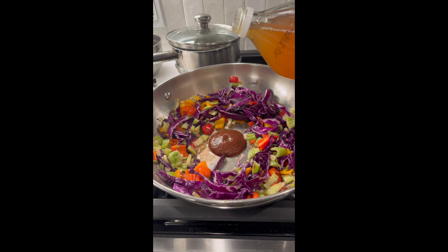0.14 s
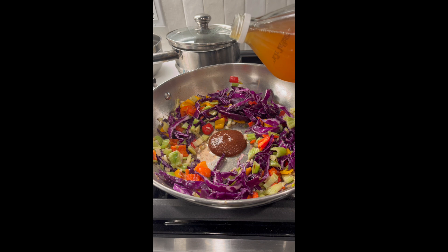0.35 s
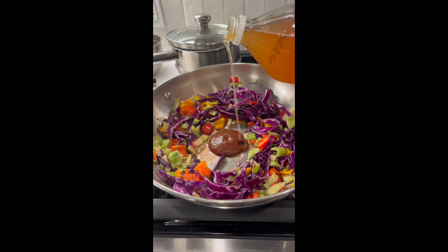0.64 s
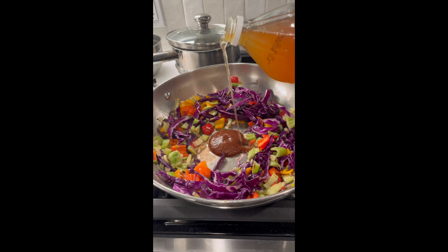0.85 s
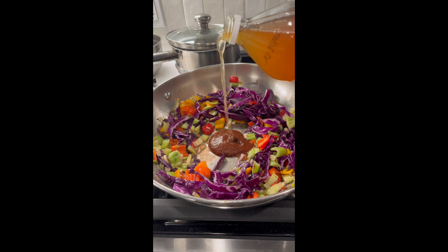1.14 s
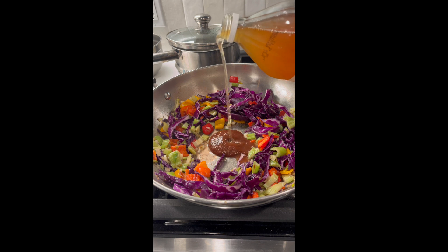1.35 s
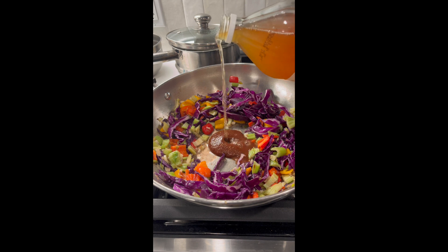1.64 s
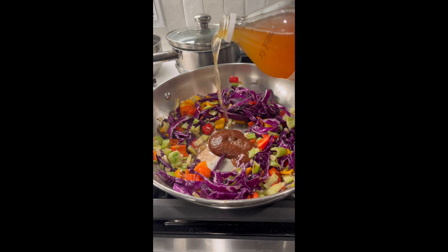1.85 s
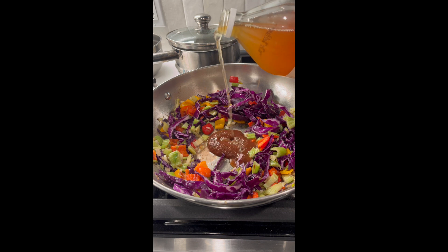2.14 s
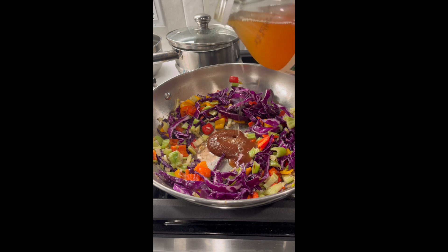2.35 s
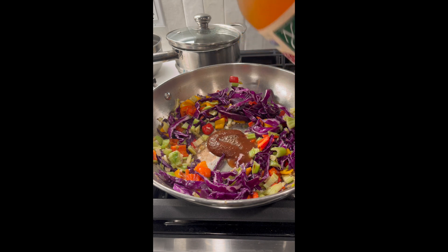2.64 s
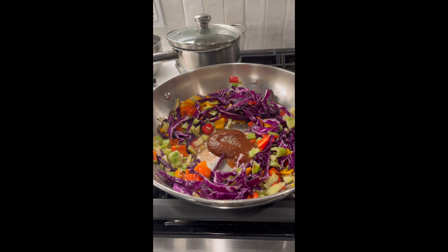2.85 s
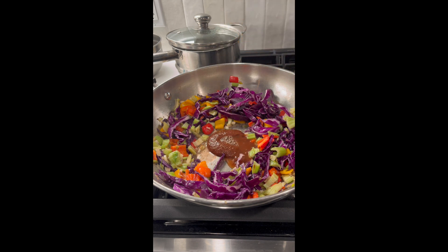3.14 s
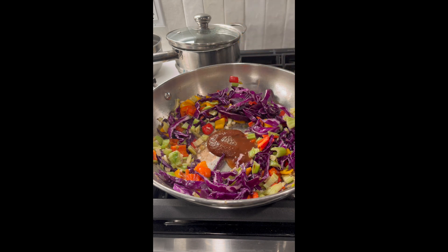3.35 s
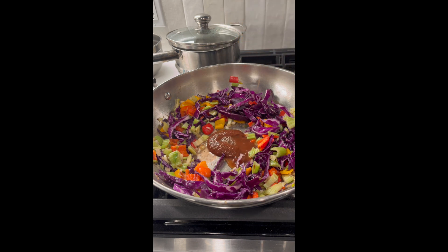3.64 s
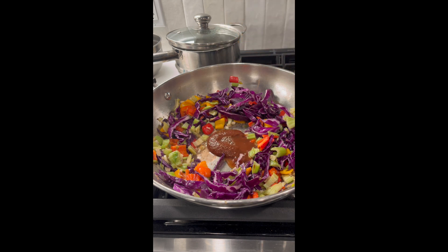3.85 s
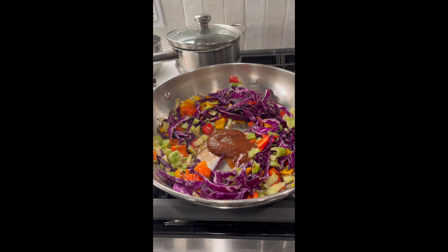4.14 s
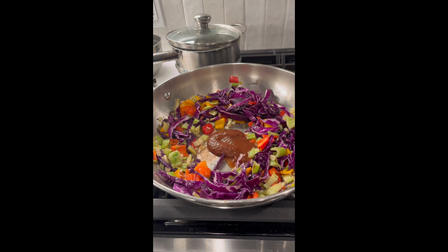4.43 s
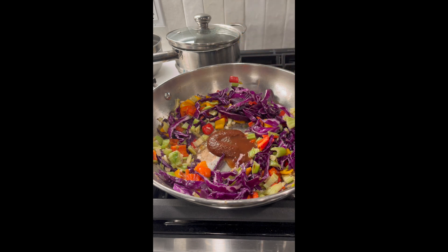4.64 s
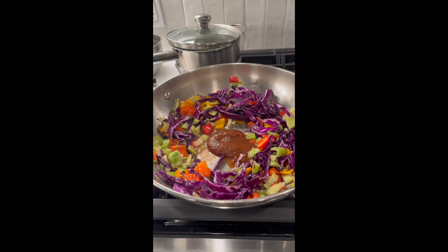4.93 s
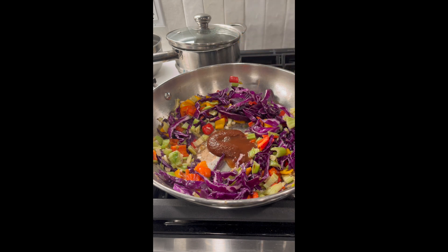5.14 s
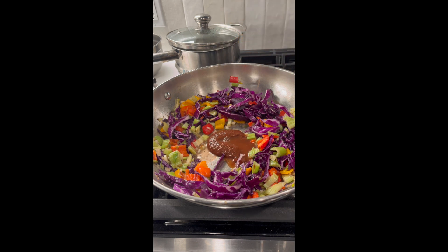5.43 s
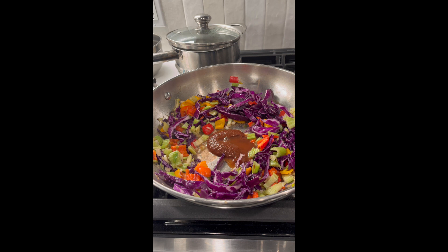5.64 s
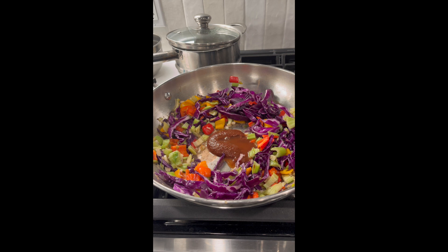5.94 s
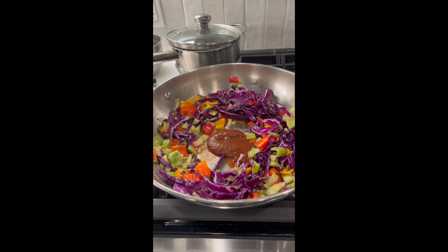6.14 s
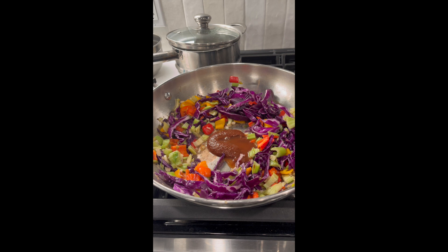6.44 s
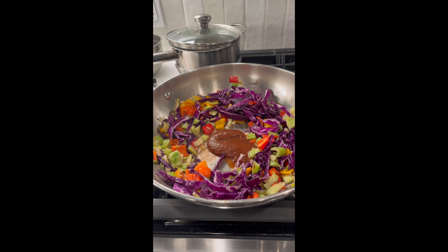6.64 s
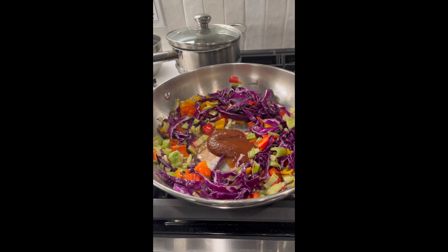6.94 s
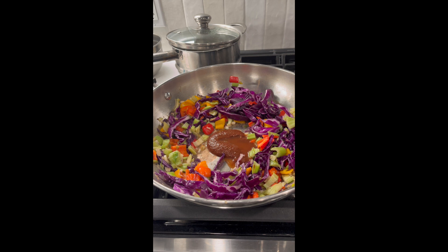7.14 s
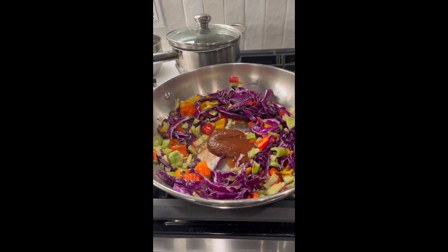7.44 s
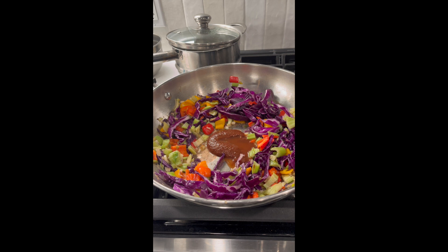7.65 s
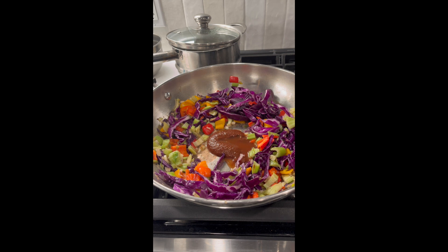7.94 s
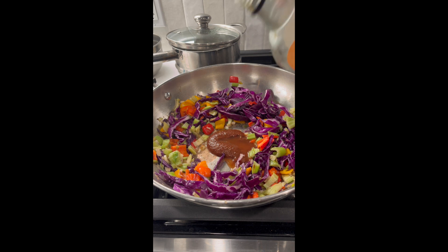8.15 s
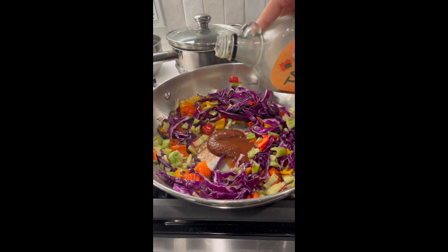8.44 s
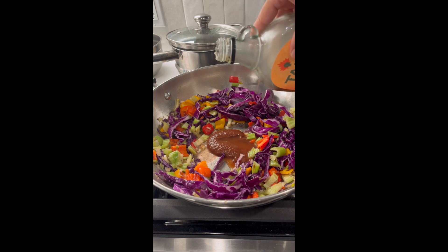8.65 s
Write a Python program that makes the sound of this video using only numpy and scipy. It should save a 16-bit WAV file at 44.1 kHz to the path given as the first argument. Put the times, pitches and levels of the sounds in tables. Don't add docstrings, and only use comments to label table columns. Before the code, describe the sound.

A short spattering pour into a hot pan over steady fan hiss, later a loud double wooden knock and soft footsteps.

```python
import sys
import numpy as np
from scipy import signal
from scipy.fft import rfft, irfft, next_fast_len
from scipy.io import wavfile
from scipy.ndimage import uniform_filter1d

SR = 44100
rng = np.random.default_rng(int(sys.argv[2]) if len(sys.argv) > 2 else 0)


def linear_from_db(decibels):
    return 10 ** (np.asarray(decibels, float) / 20)


def wav_record(signal):
    frames = np.transpose(np.atleast_2d(signal))
    bounded = np.clip(frames, -1, 1)
    quanta = np.round(bounded * 32767).astype(np.int16)
    wavfile.write(sys.argv[1], SR, quanta)


N = 387198
TOP_HZ = 15750

# time_s, flow_db
POUR = [
    (.6, -62.5),
    (1.1, -63),
    (1.36, -52),
    (1.5, -61),
    (1.64, -33),
    (1.77, -56),
    (1.9, -37),
    (2.16, -42),
    (2.55, -62),
]


def unit(x):
    return x / np.sqrt(np.mean(x ** 2) + 1e-20)


def along(points, hz):
    f, v = np.transpose(points)
    return np.interp(np.log(hz + 1), np.log(f + 1), v)


def filtered(x, response):
    m = next_fast_len(x.shape[-1] + 4096, True)
    return irfft(rfft(x, m) * response(np.fft.rfftfreq(m, 1 / SR)), m)[..., :x.shape[-1]]


def band(hz, width_hz):
    return lambda f: 1j * f * width_hz / (hz * hz - f * f + 1j * f * width_hz)


def laid(times, shapes):
    at = np.round(np.asarray(times) * SR).astype(int)[:, None] + np.arange(shapes.shape[1])
    return np.bincount(at.ravel(), shapes.ravel(), N + SR)[:N]


def bubbles(times, db, hz, t60, rise, size):
    t = np.arange(size) / SR
    db, hz, t60, rise = (np.asarray(v)[:, None] for v in (db, hz, t60, rise))
    phase = 2 * np.pi * hz * (t + rise * t * t / t60)
    onset = 1 - np.exp(-t * hz * 2.46)
    return laid(times, linear_from_db(db - 60 * t / t60) * np.sin(phase) * onset)


def bursts(times, t60, response, size=1024):
    t, f = np.arange(size) / SR, np.fft.rfftfreq(size, 1 / SR)
    shape = linear_from_db(-60 * t / t60) * (1 - np.exp(-t * 60 / t60))
    gain = response(f)
    puff = rfft(shape * rng.standard_normal((len(times), size))) * gain
    luck = np.linalg.norm(puff, axis=1) / (np.linalg.norm(shape) * np.linalg.norm(gain, axis=1))
    return laid(times, irfft(puff / luck[:, None], size))


def diffuse(pair, colour):
    # frequency_hz, correlation
    alike = [(60, .99), (250, .88), (700, .6), (1100, .9), (1850, .98), (2600, .7), (4500, .66),
             (6200, .89), (7500, .74), (9000, .89), (10500, .74), (12400, .91), (14000, .7), (15500, .85)]
    turn = lambda hz: np.arccos(np.clip(along(alike, hz), -1, 1)) / 2
    mid, side = filtered(pair, lambda hz: colour(hz) * np.array([np.cos(turn(hz)), np.sin(turn(hz))]))
    return np.array([mid + side, mid - side])


def rush(colour, patchy_db):
    z = signal.stft(rng.standard_normal((2, N)), nperseg=512)[2]
    field = uniform_filter1d(rng.standard_normal(z.shape[1:]), 6, 0)
    field = uniform_filter1d(field, 10, 1)
    noise = signal.istft(z * linear_from_db(patchy_db * unit(field)), nperseg=512)[1][:, :N]
    return unit(diffuse(noise, colour))


def house_rumble():
    about_s, about_rise_s, about_db = 4.2, 0.92, 5.5
    rumble = unit(filtered(rng.standard_normal(N), lambda hz: band(56, 30)(hz) ** 2))
    about = .5 + .5 * np.tanh((np.arange(N) / SR - about_s) / about_rise_s)
    return linear_from_db(-67 + about_db * about) * rumble


def footsteps():
    # start_s, level_db, pitch_hz, t60_s
    steps = [
        (2.989, -61, 52, 0.48),
        (3.604, -54, 56.4, 0.35),
        (4.049, -65, 51.1, 0.3),
        (5.703, -53.5, 53.5, 0.4),
        (6.759, -63.5, 69.3, 1),
        (7.511, -56.5, 47, 0.83),
        (7.639, -59, 72, 0.14),
    ]
    s, db, hz, t60 = np.transpose(steps)
    return bubbles(s, db + 13.5, hz, t60, 0 * s, size=SR // 2)


def burner_and_fan():
    # frequency_hz, density_db
    hiss = [(30, -6), (100, 1), (250, -5), (500, -2), (900, -1), (1400, 2), (2300, 0.5), (3200, 0.5),
            (5400, -1), (6300, -2), (8300, -7.5), (11300, -4.5), (13300, -9), (15800, -11)]
    # centre_hz, width_hz, height_db
    fan = [(170, 21.6, 8.5), (321, 142, 8), (600, 53, 5), (740, 15, 6.5), (1080, 72, 6)]
    humps = lambda hz: sum(db / (1 + (2 * (hz - c) / w) ** 2) for c, w, db in fan)
    colour = lambda hz: linear_from_db(along(hiss, hz) + humps(hz)) * (hz < TOP_HZ)
    return linear_from_db(-49.5) * rush(colour, patchy_db=1.04)


def cabinet():
    # start_s, level_db, pitch_hz, t60_s
    thuds = [(4.453, -39, 62, .25), (4.645, -38, 58, .2), (4.45, -19, 144, 0.15), (4.453, -24.5, 79, 0.26),
             (4.447, -29.5, 216, 0.15), (4.521, -23, 140, 0.1), (4.541, -22, 144, .09),
             (4.518, -31, 266, 0.069), (4.572, -27, 91.5, 0.11), (4.64, -16.5, 138, 0.1),
             (4.646, -24, 85.3, 0.28), (4.65, -43, 76, 0.3), (4.661, -31, 210, 0.097),
             (4.7, -36.5, 170, 0.14), (4.705, -38, 92, .12), (4.757, -35, 98, .14), (4.81, -33, 86.3, 0.22),
             (4.86, -42, 84, .3), (8.236, -47, 110, 0.12)]
    s, db, hz, t60 = np.transpose(thuds)
    return bubbles(s, db, hz, t60, 0 * s, size=SR // 2)


def glass():
    # start_s, level_db, pitch_hz, t60_s
    clink = [
        (4.462, -42, 5421, .1),
        (4.462, -52, 4807, .1),
        (4.452, -46, 2885, .08),
        (4.637, -39, 2200, .035),
        (4.661, -42, 2150, .03),
        (4.637, -33, 1460, .03),
        (8.2232, -30, 1100, .011),
        (8.2248, -31, 560, .012),
        (8.2225, -35, 1900, .007),
    ]
    s, db, hz, t60 = np.transpose(clink)
    return bubbles(s, db, hz, t60, 0 * s, size=SR // 2)


def counter():
    # start_s, level_db, hardness_db, favoured_hz
    knocks = [(4.4432, -19.5, -12, 746), (4.4465, -12.5, -25, 700), (4.4497, -8.5, -20, 555),
              (4.4605, -17, -28, 338), (4.465, -34, -24, 480), (4.481, -30, -17, 560),
              (4.5135, -18, -30, 506), (4.526, -27, -28, 450), (4.595, -30, -23, 350),
              (4.607, -30, -23, 400), (4.6355, -18.5, -18, 780), (4.6385, -10.5, -18.5, 740),
              (4.644, -17, -16, 560), (4.653, -22, -16, 540), (4.661, -18, -14.5, 550),
              (4.667, -21.5, -20, 520), (4.681, -22.5, -22, 520), (4.692, -21.5, -24, 780),
              (4.71, -37, -21, 560), (4.722, -34, -20, 750), (4.735, -31, -19, 480), (4.761, -36, -16, 750),
              (4.778, -42, -11, 700), (4.797, -42, -13, 650), (4.833, -41, -9, 600), (8.237, -39, -19, 500)]
    # frequency_hz, level_db, t60_s
    modes = [(265, -7, 0.055), (345, -3.5, 0.093), (400, -7, 0.097), (480, -17, 0.05), (519, -0.5, 0.07),
             (572, -1, 0.082), (650, -0.5, .045), (708, 4.5, 0.026), (764, 0.5, 0.035), (840, -19, 0.06),
             (980, -0.5, 0.039), (1040, -9, 0.069), (1206, -7, 0.046), (1250, -10, .04),
             (1404, -10.5, 0.059), (2070, -13, 0.043), (2190, -10.5, 0.042)]
    spot_luck_db, rattle_db = 1.5, 6.5
    detune = .012
    hz, mode_db, t60 = np.transpose(modes)
    s, db, hard_db, spot_hz = np.transpose(knocks)[:, :, None]
    luck = rng.standard_normal((len(s), 2, len(hz)))

    reach_db = np.where(hz > 900, hard_db + 14, -9 * np.abs(np.log2(hz / spot_hz)))
    strength_db = db - 8.0 + mode_db + reach_db + spot_luck_db * luck[:, 0]
    each = np.ones_like(strength_db)
    pitch_hz = hz * (1 + detune * luck[:, 1])
    ring = bubbles((s * each).ravel(), strength_db.ravel(), pitch_hz.ravel(), (t60 * each).ravel(),
                   0 * each.ravel(), size=SR // 8)

    loose = lambda f: linear_from_db(db + rattle_db) * band(spot_hz, 600)(f) ** 2 / (1 + 1j * f / 1200) ** 2
    rattle = bursts(s[:, 0], 0.088, loose, size=4096)
    crack = bursts(s[:, 0], 0.044, lambda f: linear_from_db(db + hard_db - 4.0) * band(2100, 1800)(f), size=2048)
    return ring + rattle + crack


def swarm(flow_db, hz, pitch_range, cycles, scatter_db, count):
    when, pitch, size = rng.random((count, 3)).T
    s = POUR[0][0] + when * (POUR[-1][0] - POUR[0][0])
    f = hz * np.exp(pitch_range * (2 * pitch - 1))
    db = flow_db[(s * SR).astype(int)] - scatter_db * np.log(size + .02)
    return bubbles(s, db, f, cycles / f, 0.57 + 0 * s, size=700)


def spray():
    flow_db = np.interp(np.arange(N) / SR, *np.transpose(POUR))
    fine = swarm(flow_db - 14, hz=6160, pitch_range=0.34, cycles=12, scatter_db=7.0, count=900)
    mist = swarm(flow_db - 12, hz=8800, pitch_range=0.24, cycles=14, scatter_db=5.0, count=700)
    gurgle = swarm(0.27 * flow_db - 43, hz=1910, pitch_range=0.24, cycles=8.6, scatter_db=9, count=300)
    return fine + mist + gurgle


def ticks():
    # start_s, level_db, centre_hz
    spits = [(1.273, -39, 2500), (1.378, -38, 2000), (1.6325, -42, 1800), (2.859, -47, 5000),
             (5.02, -47, 3000), (5.919, -43, 3500), (6.171, -48, 5000), (6.322, -44, 3500),
             (6.3302, -36.5, 3960), (8.2225, -40, 990), (8.568, -46, 1210)]
    s, db, hz = np.transpose(spits)[:, :, None]
    return bursts(s[:, 0], 0.0018, lambda f: linear_from_db(db + 11.0) * band(hz, 3.2 * hz)(f))


def pings():
    # start_s, level_db, pitch_hz
    small = [(0.7513, -32, 4500), (.777, -36, 3100), (.8175, -33, 4630), (.831, -32, 2950),
             (.851, -34, 3300), (.8788, -32.5, 3400), (1.137, -29.5, 2940), (1.213, -31.5, 3060),
             (1.309, -31.5, 3600), (1.384, -34, 7440), (1.4417, -29.5, 3300), (1.529, -27, 3070),
             (1.553, -32, 3100), (1.8905, -39, 8500), (2.047, -30, 4160), (2.2616, -30.5, 3930),
             (2.264, -35, 4000), (2.271, -35, 3970), (2.313, -35, 3670)]
    s, db, hz = np.transpose(small)
    return bubbles(s, db + 0.5, hz, 23.6 / hz, 0.036 + 0 * s, size=1000)


def plops():
    # start_s, level_db, pitch_hz
    trapped = [(0.938, -40, 1080), (0.974, -42, 1570), (1.273, -28, 1360), (1.2728, -32, 1830),
               (1.286, -37, 1250), (1.299, -36, 1140), (1.3244, -22.5, 980), (1.3266, -21, 1006),
               (1.334, -26, 1280), (1.343, -36, 1950), (1.35, -38, 920), (1.372, -44, 920),
               (1.392, -39, 920), (1.363, -33, 1080), (1.386, -35, 2100), (1.378, -25, 2040),
               (1.379, -38, 580), (1.392, -41, 570), (1.499, -43, 600), (1.3244, -34, 1720),
               (1.509, -39, 1630), (1.526, -29, 2120), (1.534, -32, 2020), (1.543, -32, 2100),
               (1.552, -29, 1610), (1.559, -37, 1700), (1.574, -39, 1590), (1.6, -37, 2100),
               (1.631, -36, 1470), (1.701, -31.5, 2060), (1.818, -37, 1510), (1.834, -33.5, 1880),
               (1.92, -43, 1100), (1.976, -39, 1500), (1.993, -34, 1830), (2.007, -34, 1620),
               (2.021, -31.5, 1260), (2.035, -38, 1250), (2.078, -35, 2020), (2.084, -26.5, 1960),
               (2.105, -31.5, 1720), (2.144, -33, 1780), (2.165, -30, 1830), (2.18, -23.5, 1340),
               (2.18, -28, 1960), (2.186, -34, 1800), (2.19, -36, 1450), (2.195, -33, 1700),
               (2.225, -31.5, 1290), (2.233, -35, 1240), (2.262, -38, 1080), (2.292, -36, 1800),
               (2.411, -38.5, 1430)]
    s, db, hz = np.transpose(trapped)
    t60 = .028 * (1000 / hz) ** .55
    rise = .12 * (1000 / hz) ** 0.77
    air = bubbles(s, db - 3.5, hz, t60, rise, size=3000)
    around = lambda f: linear_from_db(db[:, None] - 1) * band(hz[:, None], 600)(f) ** 2
    return air + bursts(s, 0.012, around, size=2048)


def drops():
    # peak_s, splat_db, ring_db, spit_db, ring_hz
    bursting = [(0.723, -48, -45, -26.5, 10400), (0.75, -38, -36, -37, 10600), (0.7774, -50, -49, -37, 7800),
                (0.789, -50, -31, -46, 7600), (0.8153, -45, -32, -49, 9300), (1.0715, -51, -33, -47, 8300),
                (1.1003, -52, -52, -41, 10500), (1.2104, -48, -39, -36, 8000), (1.2423, -50, -30, -48, 8040),
                (1.2522, -32.5, -34, -54, 8000), (1.2628, -47, -53, -38, 10100), (1.292, -46, -33, -50, 9800),
                (1.2957, -52, -29, -54, 8200), (1.3095, -45, -35, -52, 9900), (1.342, -54, -32.5, -54, 8400),
                (1.418, -38, -36, -39, 8400), (1.442, -47, -31, -31, 11000), (1.48, -54, -36, -46, 8000),
                (1.487, -56, -31, -53, 9800), (1.5273, -35, -34, -37, 8300), (1.5361, -39, -32, -45, 8300),
                (1.553, -34.5, -31, -50, 6800), (1.6535, -35.5, -26, -33, 7800),
                (1.675, -48, -29, -36, 10000), (1.7144, -40, -40, -45, 9800), (1.7208, -45, -30, -44, 9900),
                (1.7532, -50, -26.5, -54, 7150), (1.828, -54, -33, -54, 8050), (1.8346, -54, -39, -38, 10900),
                (1.9203, -54, -54, -37, 11000), (1.9499, -48, -33, -47, 10000), (1.9636, -54, -46, -38, 8800),
                (2.0214, -40, -28, -43, 10000), (2.043, -47, -35, -53, 7500), (2.0475, -35, -32, -44, 7450),
                (2.0778, -40, -32, -35, 7160), (2.1176, -34.5, -37, -43, 7200), (2.1663, -42, -30, -45, 9400),
                (2.1969, -41, -51, -40, 10400), (2.2613, -42, -34.5, -52, 8600),
                (0.6475, -51, -38, -54, 10200), (0.7266, -53, -54, -47, 10900), (0.73, -54, -36, -50, 10300),
              (0.7803, -54, -54, -45, 10000), (0.8, -54, -36, -54, 9100), (0.867, -46, -51, -44, 9300),
              (0.8795, -45, -44, -54, 9150), (1.088, -52, -50, -43, 7900), (1.1161, -53, -39, -54, 8200),
              (1.213, -46, -45, -50, 7500), (1.2734, -41, -48, -54, 8000), (1.4033, -40, -37, -54, 8300),
              (1.4527, -53, -36, -49, 6700), (1.4595, -48, -47, -47, 8300), (1.5094, -36, -39, -50, 10000),
              (1.529, -46, -44, -50, 7800), (1.5993, -42, -36.5, -54, 8100), (1.6095, -46, -38, -50, 7000),
              (1.634, -41, -41, -49, 10100), (1.64, -48, -36, -53, 7100), (1.693, -52, -33, -48, 7060),
              (1.703, -43, -37, -53, 8400), (1.762, -42, -38, -54, 8400), (1.7968, -53, -38, -54, 8500),
              (1.808, -46, -36, -54, 9500), (1.914, -35.5, -43, -45, 9600), (1.9427, -54, -43, -49, 10000),
              (1.9792, -37, -39, -50, 7400), (2.005, -35.5, -51, -43, 10900), (2.01, -40, -37, -47, 10200),
              (2.0502, -40, -39, -54, 7500), (2.0578, -52, -36, -54, 7500), (2.0641, -51, -43, -52, 9900),
              (2.0861, -43, -41, -50, 8700), (2.1036, -54, -32, -54, 7200), (2.1078, -44, -38, -47, 6900),
              (2.1223, -43, -38, -53, 10100), (2.1592, -54, -41, -53, 8600), (2.2641, -42, -41, -54, 8700),
              (2.2937, -41, -42, -50, 9000)]
    s, dull_db, ring_db, bright_db, hz = np.transpose(np.array(bursting))[:, :, None]
    at = s[:, 0] - .0006
    snap_t60_s = .0058
    splat = bursts(at, 2.66 * snap_t60_s, lambda f: linear_from_db(dull_db + 10) * band(4100, 3000)(f) ** 2)
    own = lambda f: band(hz, .2 * hz)(f) * band(8500, 9000)(f)
    body = lambda f: linear_from_db(-20) * band(6200, 2000)(f) ** 2
    ring = bursts(at, snap_t60_s, lambda f: linear_from_db(ring_db + 10.5) * (own(f) + body(f)))
    spit = bursts(at, 1.2 * snap_t60_s, lambda f: linear_from_db(bright_db + 11.5) * band(15000, 5000)(f) ** 2)
    return splat + ring + spit


def room(x, wet_db):
    # frequency_hz, t60_s
    decay = [(100, 0.69), (500, 0.51), (2000, 0.61), (8000, 0.19)]
    hz, t, z = signal.stft(rng.standard_normal((2, SR // 2)), SR, nperseg=256)
    fading = signal.istft(z * linear_from_db(-60 * t / along(decay, hz)[:, None]), SR, nperseg=256)[1]
    tail = diffuse(fading, np.ones_like)
    tail = tail / np.linalg.norm(tail[0])
    late = signal.oaconvolve(np.pad(x, (250, 0))[None], tail, axes=1)[:, :N]
    return x + linear_from_db(wet_db) * late


def jar_set_down():
    jar = counter() + glass() + cabinet()
    aside = lambda f: np.array([linear_from_db(-4 * f / (f + 500)) * np.exp(-2j * np.pi * f * 0.000097), np.ones_like(f)])
    wall = filtered(jar, lambda f: band(800, 1200)(f) * np.exp(-2j * np.pi * f * .0068))
    return filtered(room(jar, -15), aside) + linear_from_db(-26) * np.outer([1, -1], wall)


def pan():
    broth = drops() + plops() + pings() + spray() + ticks()
    scatter = filtered(drops(), lambda f: band(5800, 5000)(f) ** 2 + linear_from_db(6.0) * band(12500, 2500)(f) ** 2)
    return room(broth, -13) + linear_from_db(-0.5) * np.outer([1, -1], scatter)


def scene():
    return burner_and_fan() + house_rumble() + footsteps() + jar_set_down() + pan()


def wind_guard(x):
    # time_s, edge_hz
    guard = [(1.55, 18), (1.75, 350), (2.1, 140), (2.2, 540), (2.5, 1030), (2.62, 2000), (2.75, 1900),
             (2.95, 1500), (3.08, 1200), (3.2, 690), (3.4, 340), (3.6, 41)]
    # frequency_hz, gain_db
    guard_cut = [(60, -5.5), (110, -9), (300, -10), (950, -6.5), (1150, -4.5), (2500, -6)]
    hz, t, z = signal.stft(x, SR, nperseg=1024)
    edge = np.interp(t, *np.transpose(guard), left=1, right=1)
    under = 1 / (1 + (hz[:, None] / edge) ** 14)
    return signal.istft(z * linear_from_db(along(guard_cut, hz)[:, None] * under), SR, nperseg=1024)[1][:, :N]


def ports(x):
    # frequency_hz, difference_db
    tilt = [(60, 1.5), (130, 0.5), (290, 1), (640, -1), (1410, 1), (3100, -3), (6820, 0), (15000, 0.5)]
    # frequency_hz, lead_rad
    lead = [(0, 0), (600, -.8), (1200, -.3), (2050, .1), (2800, 2.2), (4050, .6), (5750, 2.7), (6750, 3.55),
            (8300, 5.85), (9750, 6.7), (11400, 8.95), (13500, 9.9), (14450, 12.05), (22050, 13.6)]
    # frequency_hz, gain_db
    nulls = [(5550, -0.5), (5700, -13), (6250, -3.5), (6900, 2), (11200, 1), (11800, -8.5), (13400, -12),
             (13750, 0.5)]
    half = np.array([[.5], [-.5]])
    x = filtered(x, lambda f: linear_from_db(half * along(tilt, f)) * np.exp(1j * half * np.interp(f, *np.transpose(lead))))
    return x + filtered(x.mean(axis=0), lambda f: linear_from_db(along(nulls, f)) - 1)


def roll_off(x):
    return signal.sosfilt(signal.butter(12, 17130, fs=SR, output="sos"), x)


def record(dry):
    x = wind_guard(dry)
    x = filtered(x, lambda f: (1j * f / (55 + 1j * f)) ** 2 * np.where(f < TOP_HZ, 1, linear_from_db(-32)))
    return roll_off(ports(x))


dry = scene()
out = record(dry)
wav_record(out)
```